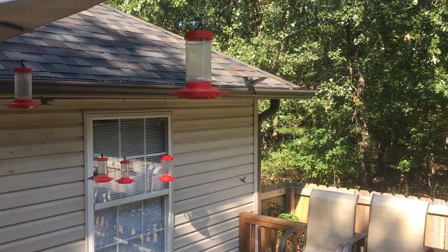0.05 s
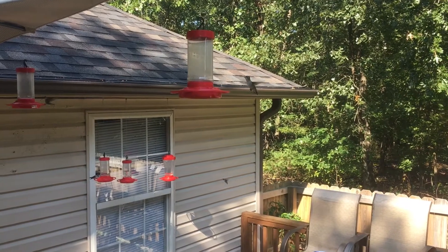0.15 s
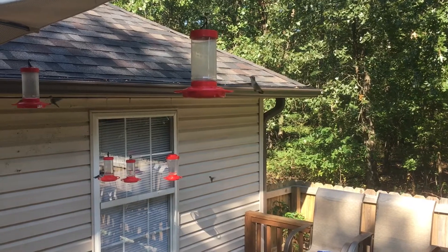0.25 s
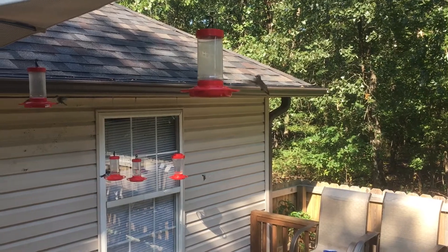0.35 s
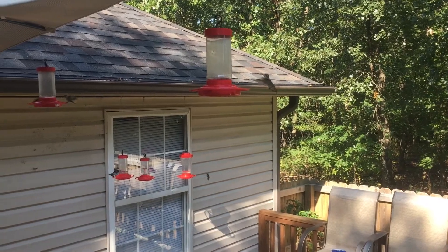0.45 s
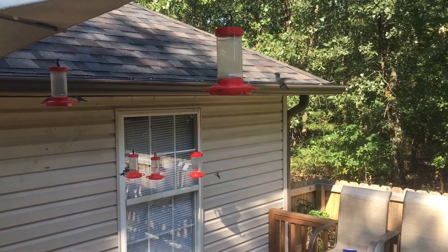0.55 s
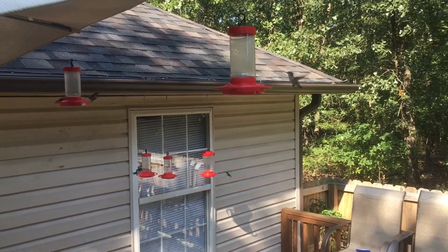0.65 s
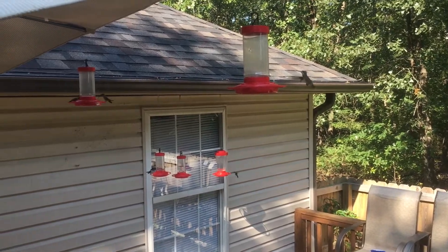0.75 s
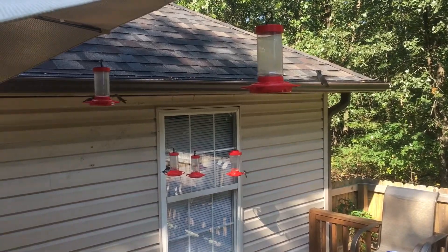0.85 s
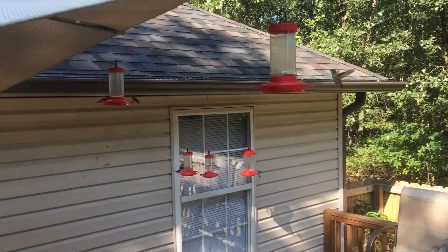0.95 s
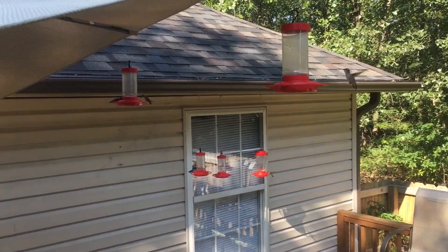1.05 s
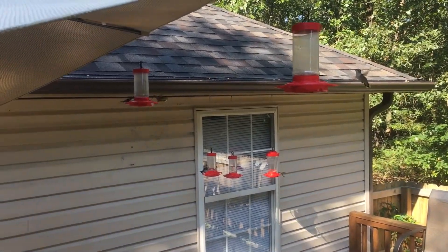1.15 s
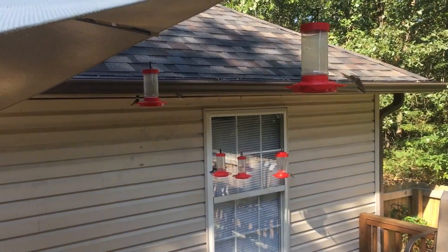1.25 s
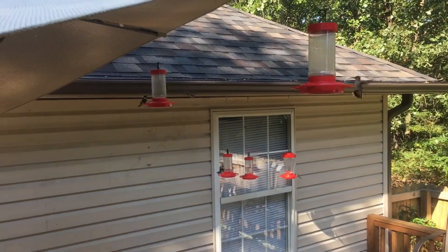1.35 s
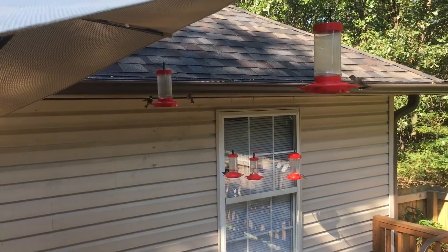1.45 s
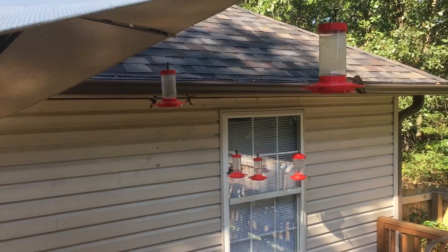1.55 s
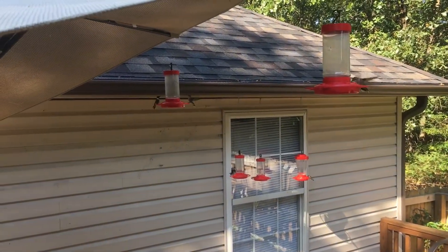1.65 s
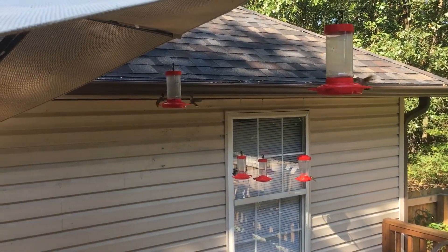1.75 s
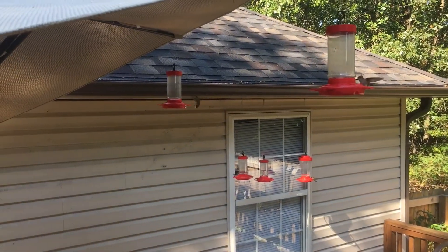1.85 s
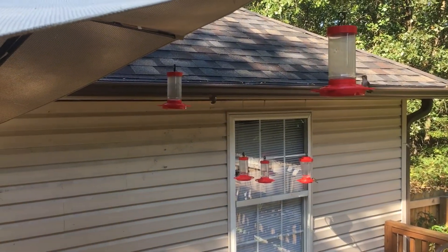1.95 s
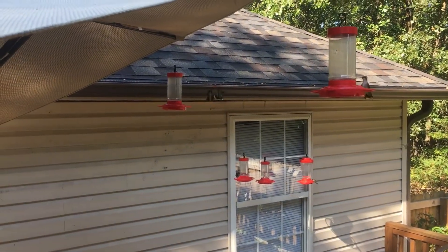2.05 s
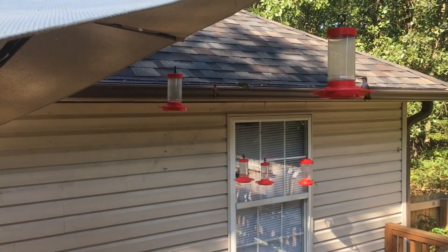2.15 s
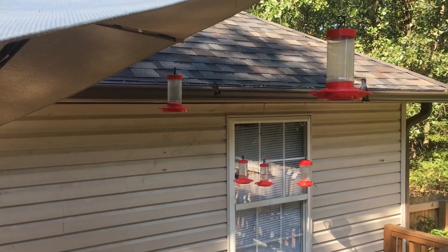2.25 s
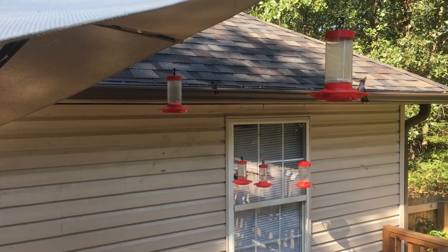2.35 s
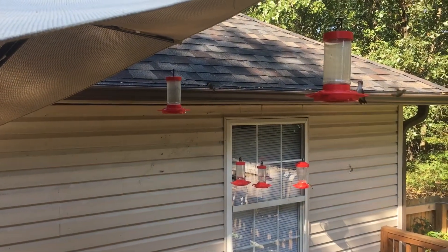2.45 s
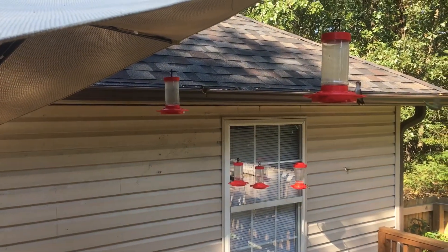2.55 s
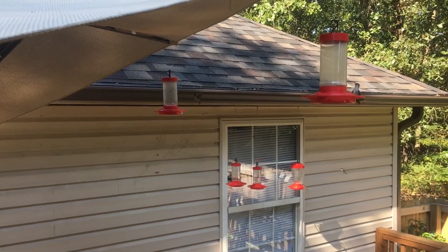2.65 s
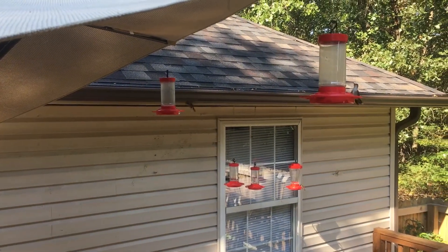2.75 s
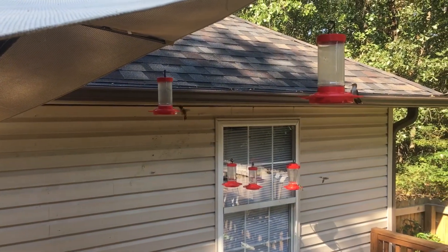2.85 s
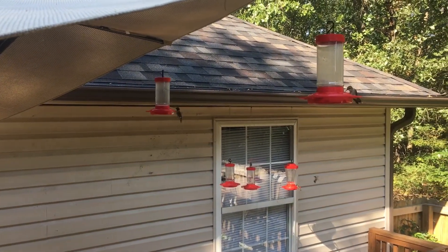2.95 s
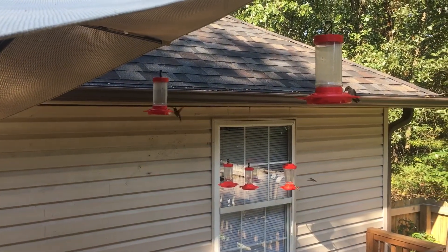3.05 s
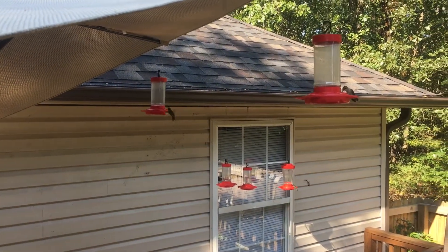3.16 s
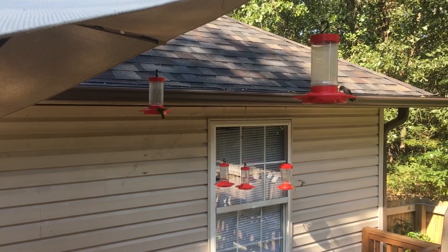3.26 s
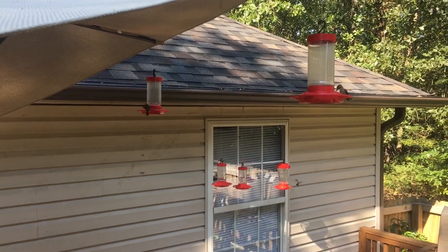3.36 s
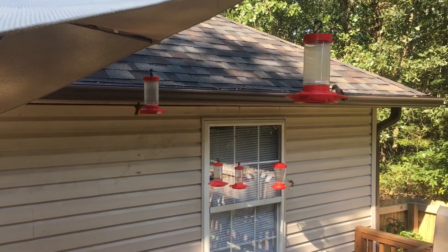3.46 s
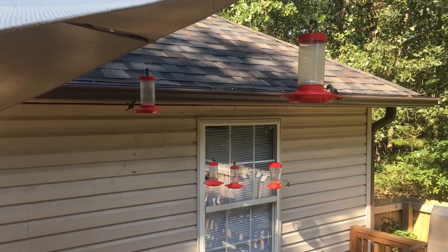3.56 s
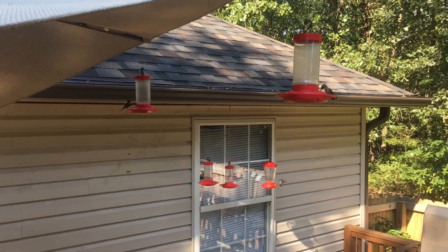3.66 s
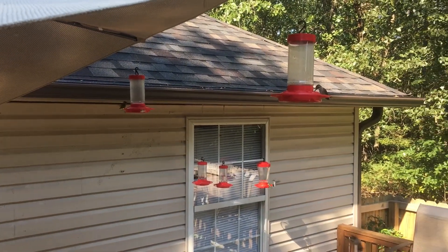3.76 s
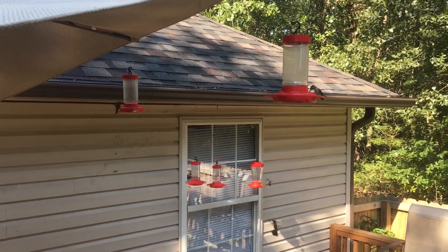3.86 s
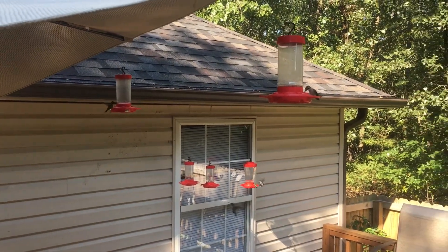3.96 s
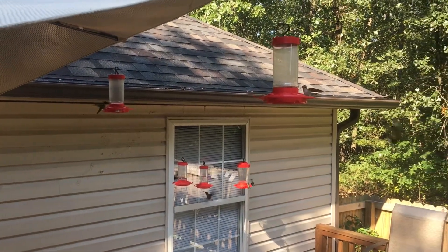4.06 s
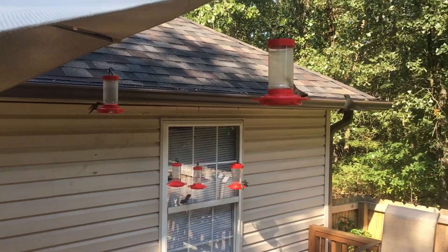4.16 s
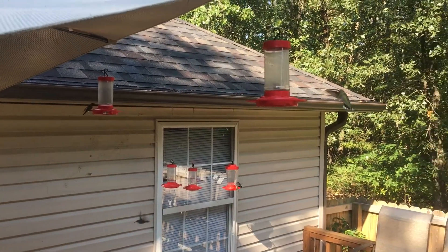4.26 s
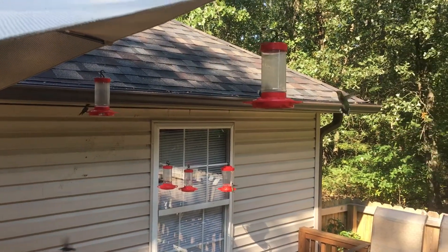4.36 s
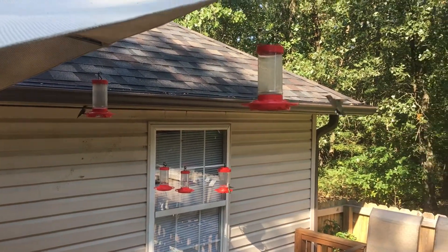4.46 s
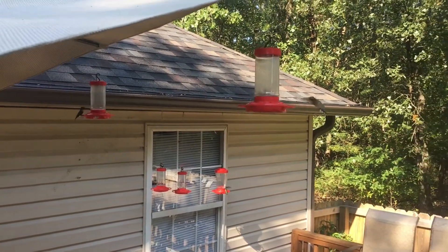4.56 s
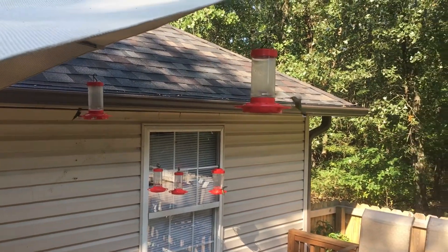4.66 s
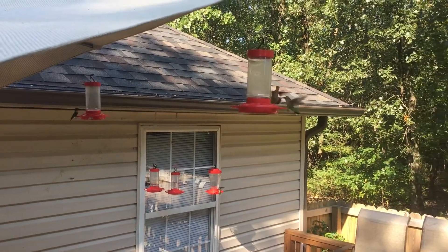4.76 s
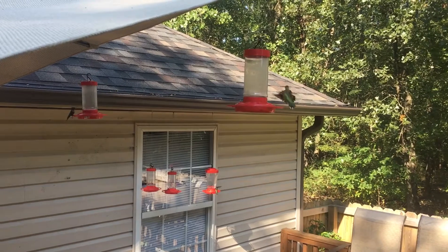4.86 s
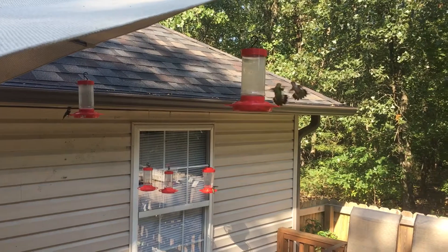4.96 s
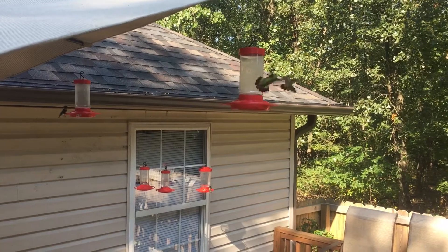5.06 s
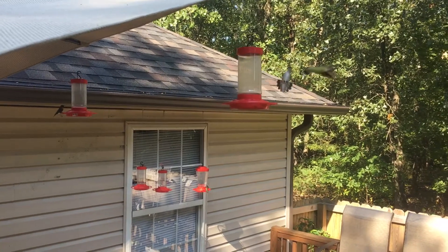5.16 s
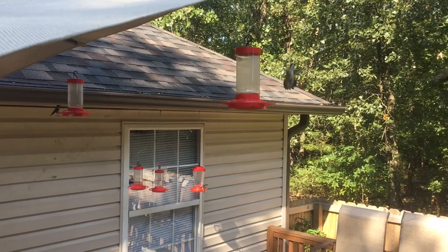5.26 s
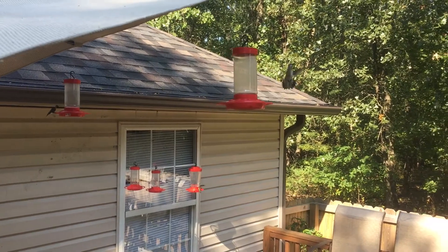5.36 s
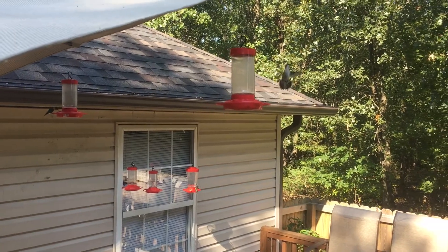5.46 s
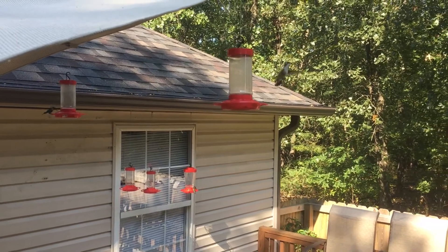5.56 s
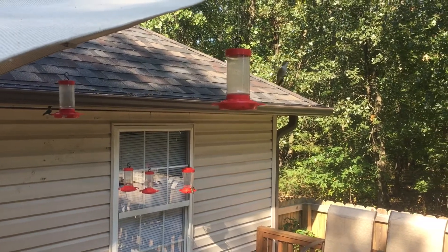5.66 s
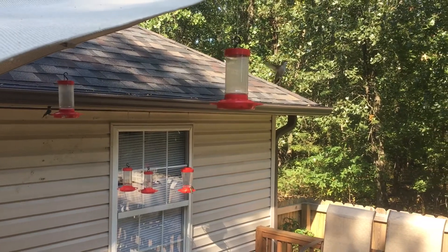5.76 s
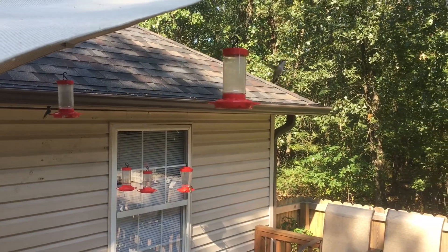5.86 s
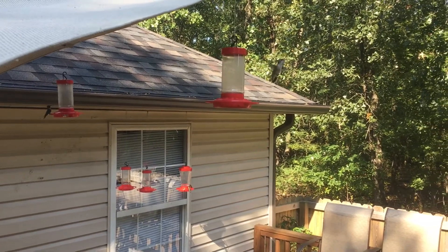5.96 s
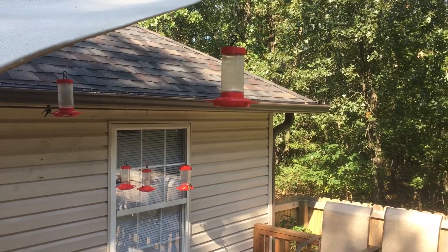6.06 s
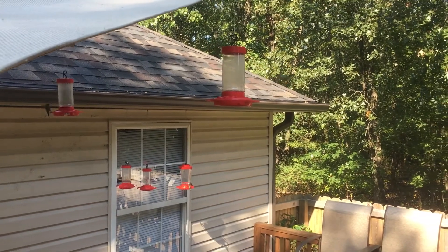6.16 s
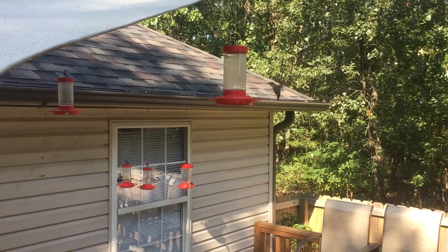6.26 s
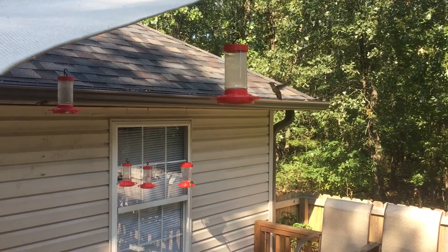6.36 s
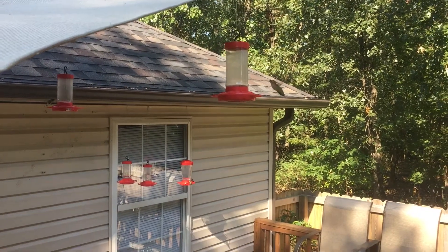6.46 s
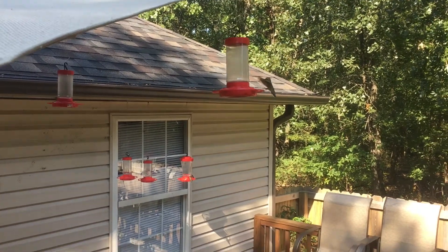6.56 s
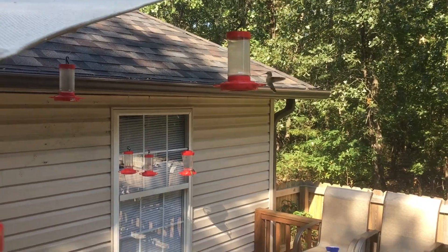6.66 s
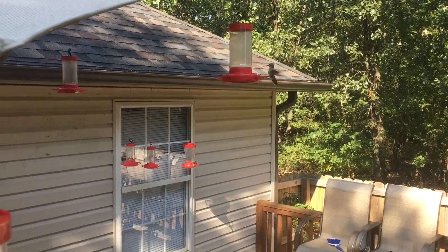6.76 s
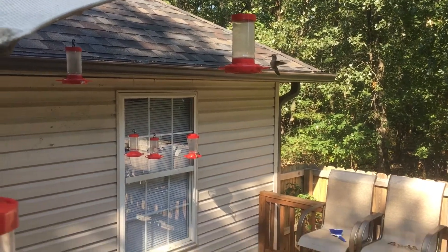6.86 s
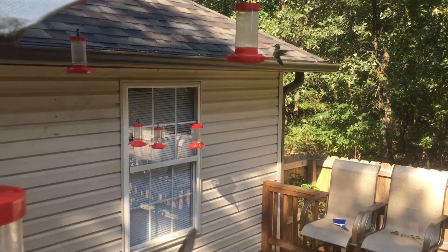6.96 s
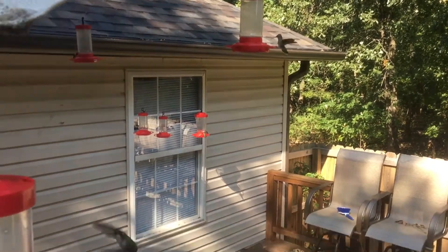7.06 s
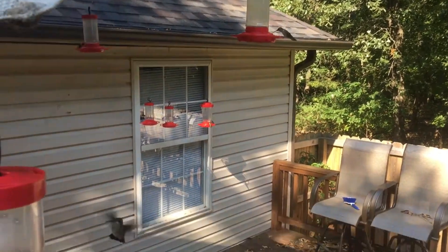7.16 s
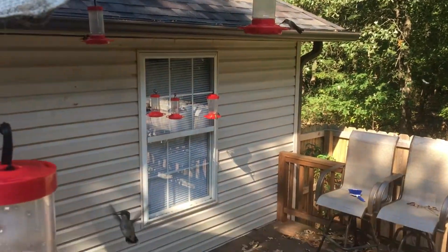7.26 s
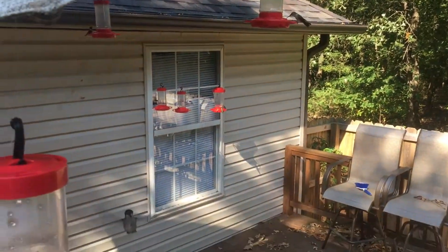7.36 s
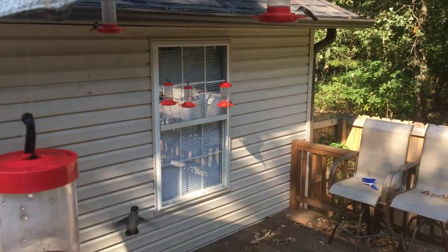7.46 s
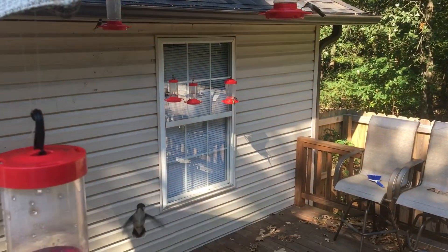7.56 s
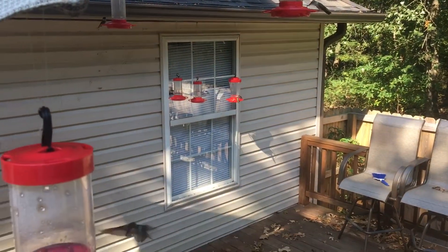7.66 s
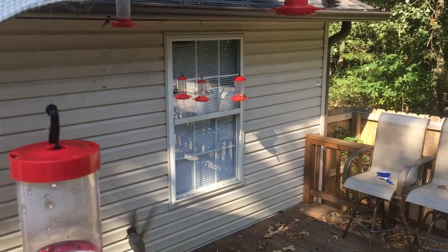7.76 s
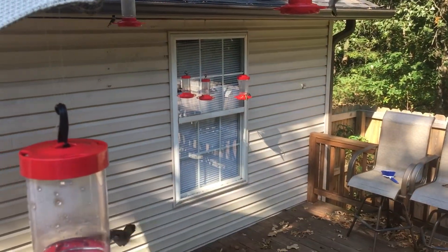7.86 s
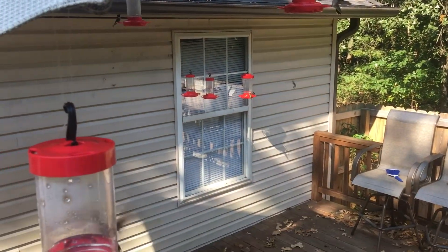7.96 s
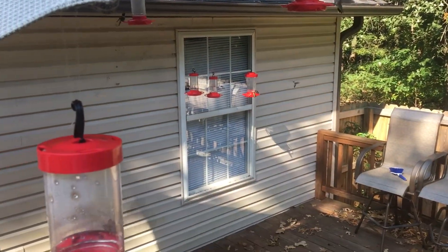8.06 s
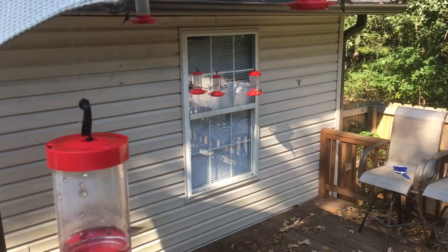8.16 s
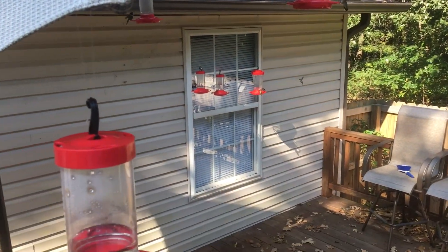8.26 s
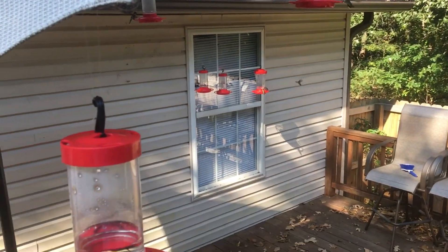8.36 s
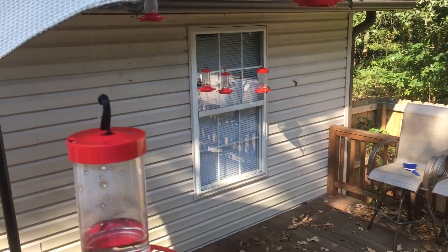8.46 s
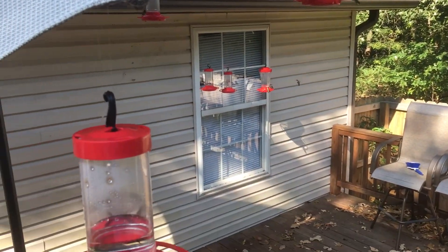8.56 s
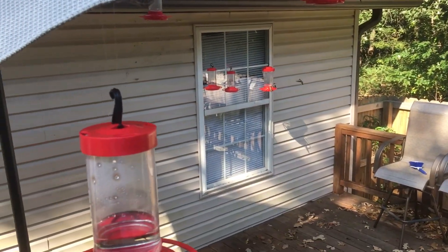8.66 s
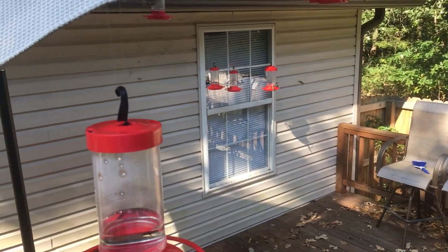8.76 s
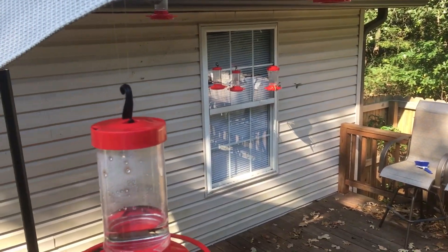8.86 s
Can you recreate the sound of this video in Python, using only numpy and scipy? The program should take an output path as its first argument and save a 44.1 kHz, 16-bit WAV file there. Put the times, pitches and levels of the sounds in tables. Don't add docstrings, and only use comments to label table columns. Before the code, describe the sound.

Hummingbirds squeak, chip and buzz in sharp quick bursts around backyard feeders, wings humming past, over a soft shimmer of insects and a distant plane drone.

```python
import sys
import numpy as np
from scipy import signal
from scipy.fft import rfft, irfft
from scipy.io import wavfile

SR = 44100
rng = np.random.default_rng(int(sys.argv[2]) if len(sys.argv) > 2 else 0)


def invert_db(x):
    u = np.asarray(x, float) / 20
    return 10 ** u


def store_wav(level_fs):
    pcm = np.round(np.clip(np.atleast_2d(level_fs), -1, 1) * 32767)
    wavfile.write(sys.argv[1], SR, pcm.T.astype(np.int16))


N = 392490
T = np.arange(N) / SR

# hz, gain_db
FACING = [(1500, 1), (3000, -4.5), (4500, -7), (6300, -1), (8300, 1), (10500, -7), (13000, -9),
          (16000, -24)]


def rms_one(x):
    return x / np.sqrt(np.mean(x ** 2) + 1e-20)


def in_time(rows, t=T):
    s, *columns = np.transpose(rows)
    return [np.interp(t, s, c) for c in columns]


def at_hz(points, hz):
    return np.interp(np.log(hz), np.log(np.array(points)[:, 0]), np.array(points)[:, 1])


def span(start_s, length_s):
    return np.arange(round(start_s * SR), min(round((start_s + length_s) * SR), N))


def bump(t, half_s):
    return np.exp(-0.5 * (t / half_s) ** 2)


def drift(rate_hz):
    r = np.exp(-80 * np.pi * rate_hz / SR)
    slow = signal.lfilter([1], [1, -2 * r, r * r], rng.standard_normal(N // 40 + 2002))[2000:]
    return np.interp(np.arange(N) / 40, np.arange(len(slow)), rms_one(slow))


def coloured(spectrum):
    hz = np.arange(1, N // 2 + 2) * SR / N
    inside = (hz > spectrum[0][0]) & (hz < spectrum[-1][0])
    gain = invert_db(at_hz(spectrum, hz)) * inside
    return rms_one(irfft(rfft(rng.standard_normal(N)) * gain, N))


def resonate(x, hz, width_hz):
    r = np.exp(-np.pi * width_hz / SR)
    return signal.lfilter([1, 0, -1], [1, -2 * r * np.cos(2 * np.pi * hz / SR), r * r], x)


def yard(x, t60_s, gap_s):
    t = np.arange(SR // 2) / SR
    burst = rng.standard_normal(len(t)) * invert_db(-60 * t / t60_s) * (t > gap_s)
    return signal.fftconvolve(x, burst / np.linalg.norm(burst))[:N]


def voice(pitch_hz, throat, overtones_db=0):
    phase = 2 * np.pi * np.cumsum(pitch_hz) / SR
    ranks = np.arange(1, 11)[:, None]
    audible = ranks * pitch_hz < 0.45 * SR
    gains = invert_db(at_hz(throat, ranks * pitch_hz) + overtones_db * (ranks > 1)) * audible
    return (gains * np.sin(ranks * phase)).sum(axis=0)


def whistles(notes, octave_db, hoarse, peak_at, swell_db, fade_db, edge_s=0.0017):
    out, wobble, flutter = np.zeros(N), drift(230), drift(90)
    wobble_hz, flutter_db = hoarse
    for start_s, length_s, first_hz, last_hz, level_db in notes:
        at = span(start_s, length_s)
        share = (at - at[0]) / SR / length_s
        pitch_hz = first_hz + (last_hz - first_hz) * share + wobble_hz * wobble[at]
        phase = 2 * np.pi * np.cumsum(pitch_hz) / SR
        effort_db = np.interp(share, [0, peak_at, 1], [-swell_db, 0, -fade_db])
        edge = np.clip(np.minimum(share, 1 - share) * length_s / edge_s, 0, 1)
        gain = np.sqrt(2) * edge * invert_db(level_db + effort_db + flutter_db * flutter[at])
        out[at] += gain * (np.sin(phase) + invert_db(octave_db) * np.sin(2 * phase))
    return out


def chips(table, throat, bend, rise, fall, depth=0, rough=0):
    warble_hz = 207
    out, shiver, waver = np.zeros(N), invert_db(drift(60.0)), drift(274)
    for start_s, length_s, first_hz, last_hz, level_db, *turn_db in table:
        at = span(start_s, length_s)
        t = (at - at[0]) / SR
        share = t / length_s
        slide_hz = first_hz + (last_hz - first_hz) * share ** bend
        close = np.clip((share - 0.86) / 0.089, 0, 1)
        warble = depth * ((1 - close) * np.cos(2 * np.pi * warble_hz * (t - 0.001)) - close)
        pitch_hz = slide_hz + first_hz * (warble + rough * waver[at])
        swell = np.clip(np.minimum(share / rise, (1 - share) / fall), 0, 1)
        gain = invert_db(level_db) * np.sin(np.pi / 2 * swell) ** 2
        out[at] += gain * voice(pitch_hz, throat, sum(turn_db))
    return out * shiver


def alike(table, length_s, ends_at):
    return [(s, length_s, hz, hz * ends_at, db) for s, hz, db in table]


def air_rumble():
    # hz, level_db_per_hz
    spectrum = [(25, -36), (38, -5), (55, 1), (100, -4.5), (200, -8), (400, -19.5), (800, -30), (1400, -36),
                (3000, -43)]
    gust_db = 2.5 * bump(T - 6.3, 0.16)
    return invert_db(-56 + gust_db) * coloured(spectrum)


def plane():
    # time_s, blade_hz, level_db, octave_db
    course = [(0, 169.9, -49.5, -66.5), (2.2, 167.8, -50, -68), (4.6, 163.4, -50.5, -70.5),
              (5.3, 162.8, -55.5, -78), (5.8, 163.2, -58, -94), (6.7, 159.1, -56.5, -73),
              (7.6, 158.9, -61.5, -80), (8.9, 160, -64.5, -80)]
    pitch_hz, level_db, octave_db = in_time(course)
    phase = 2 * np.pi * np.cumsum(pitch_hz) / SR + 0.16 * drift(2.6)
    waver = invert_db(drift(10.0))
    return np.sqrt(2) * waver * (invert_db(level_db) * np.sin(phase) + invert_db(octave_db) * np.sin(2 * phase))


def cicadas():
    # time_s, low_db, high_db
    levels = [(0.0, -63.5, -62.5), (7.93, -68.5, -62.5), (8.9, -66.5, -59.5)]
    # hz, level_db_per_hz
    low_spectrum = [(530, -60), (900, -6), (947, -9.5), (1680, -7.5), (1970, -1), (2220, 4), (2630, 2.5),
                    (2870, 4), (3320, 4.5), (3710, -1.5), (5200, -17), (6760, -43), (11400, -120)]
    # hz, level_db_per_hz
    high_spectrum = [(2710, -26), (4600, -7), (5100, -8), (5730, -4), (6060, 1.5), (6620, -3.5), (7330, -1),
                     (7950, -1), (8460, -1), (9000, -1.5), (9710, -8), (10500, -16), (13000, -12.5),
                     (15600, -17)]
    low_db, high_db = in_time(levels)
    singers = np.zeros(N)
    for hz in (2275, 2500, 2854, 3250):
        singers += invert_db(1.8 * drift(6.4)) * rms_one(resonate(rng.standard_normal(N), hz, 97))
    low = invert_db(1.07 * drift(14.4)) * coloured(low_spectrum) + invert_db(-11.5) * singers
    pulses = np.exp(0.64 * np.cos(2 * np.pi * 162 * T + 2.4 * drift(6.3)))
    buzz = rms_one(resonate(resonate(rng.standard_normal(N), 6120, 400), 6120, 400) * pulses)
    high = invert_db(1.35 * drift(7.3)) * coloured(high_spectrum) + invert_db(-19.0 + 0.66 * drift(5.9)) * buzz
    return invert_db(low_db) * low + invert_db(high_db) * high


def crickets():
    # start_s, end_s, wing_tone_hz, pulses_per_s, level_db
    bouts = [(0, 1.24, 8545, 29.6, -66), (1.27, 2.9, 8190, 30.3, -73), (2.33, 4.4, 8465, 29.2, -69.5),
             (4.4, 7.01, 8545, 28.9, -68.5), (7.0, 8.9, 8190, 31, -72), (0, 3.95, 7755, 26, -70),
             (5.52, 5.8, 7080, 28, -68), (2.1, 2.95, 7050, 24, -76), (4.5, 8.9, 7745, 26.8, -70)]
    rasp_db, rasp_below_hz, rasp_width_hz = -5, 160, 240
    out, waver, fading = np.zeros(N), drift(30), drift(9)
    for k, (start_s, end_s, hz, per_s, level_db) in enumerate(bouts):
        at = span(start_s, end_s - start_s)
        own = (at - k * SR) % N
        tone_hz = hz + 24 * waver[own]
        stroke = np.exp(0.55 * np.cos(2 * np.pi * per_s * T[at] + 0.8 * fading[at]))
        tone = rms_one(stroke * np.sin(2 * np.pi * np.cumsum(tone_hz) / SR))
        rasp = rms_one(resonate(rng.standard_normal(len(at)), hz - rasp_below_hz, rasp_width_hz))
        out[at] += invert_db(level_db + 1.5 * fading[own]) * (tone + invert_db(rasp_db) * rasp)
    return out


def katydids():
    wing_hz = [9350, 8850]
    steady_s = [.04, .26, .45, .71, .95, 1.21, 1.46, 1.75, 2.0, 2.27, 2.53, 2.77, 2.98, 3.2, 3.5, 3.74,
                4.03, 4.24, 4.48, 4.74, 5.0, 5.25, 5.5, 5.72, 6.0, 6.25, 6.5, 6.82, 7.08, 7.33, 7.6, 7.82,
                8.05, 8.33, 8.62, 8.82]
    # time_s, level_db
    steady_level = [(0, -68.5), (5.5, -75), (6.6, -65), (8.9, -70)]
    fitful_s = [.06, .29, .55, .82, 1.15, 1.42, 1.66, 1.86, 2.13, 2.39, 2.63, 3.05, 3.29, 3.53, 3.77, 4.27,
                4.57, 5.67, 5.9, 6.1, 6.32, 6.52, 6.85, 7.07, 7.3, 7.56, 8.01, 8.6]
    fitful_db, spread_db = -71, 0.8
    out, teeth = np.zeros(N), 1.8 + 0.14 * np.cos(2 * np.pi * 130 * T)
    steady = list(zip(steady_s, in_time(steady_level, steady_s)[0]))
    fitful = [(s, fitful_db) for s in fitful_s]
    for chirps, hz in zip([steady, fitful], wing_hz):
        rasp = rms_one(resonate(resonate(rng.standard_normal(N) * teeth, hz, 300), hz, 300))
        for (middle_s, level_db), luck in zip(chirps, rng.standard_normal(len(chirps))):
            at = span(max(middle_s - 0.05, 0), 0.1)
            out[at] += invert_db(level_db + 2.5 + spread_db * luck) * rasp[at] * np.hanning(len(at))
    return out


def far_hoot():
    # start_s, length_s, first_hz, last_hz, level_db
    hoots = [
        (6.56, 0.15, 1018, 980, -69.5),
        (6.69, 0.201, 990, 900, -68),
    ]
    return whistles(hoots, octave_db=-32, hoarse=(9, 1.3), peak_at=0.18, swell_db=4, fade_db=12, edge_s=0.015)


def wings():
    # middle_s, half_length_s, hum_db, beats_per_s
    passes = [(0.545, 0.11, -65.5, 52), (1.204, 0.43, -66, 46.5), (2.099, 0.21, -62, 60),
              (2.493, 0.099, -63, 53), (2.97, 0.13, -57, 50), (3.397, 0.21, -65.5, 51),
              (3.8, 0.093, -59, 53), (4.162, .06, -53.5, 43), (4.697, 0.054, -61, 53),
              (4.877, 0.049, -60, 55), (5.199, 0.086, -60, 49.4), (5.595, .12, -63, 46),
              (5.022, 0.046, -63, 46), (6.36, .08, -58, 45), (6.653, .2, -60, 42), (7.011, 0.051, -57, 50),
              (7.117, 0.099, -57.5, 41), (7.502, 0.14, -64, 41), (7.801, 0.15, -59, 41),
              (8.116, .12, -60.5, 44.7), (8.601, 0.25, -68, 51)]
    # multiple_of_beat, gain_db
    orders = [(1, -6.5), (2, 3), (3, -8), (4, -1), (5, -11), (6, -9.5), (8, -10.5), (10, -26.5),
              (12, -19.5)]
    # hz, level_db_per_hz
    hiss_spectrum = [(60, -10), (150, 0.5), (400, -6.5), (800, -24.5), (2000, -26.5), (5000, -31),
                     (12000, -36)]
    out, hiss, effort = np.zeros(N), coloured(hiss_spectrum), drift(6.0)
    ranks, order_db = np.transpose(orders)[:, :, None]
    biases = rng.standard_normal((len(passes), len(orders), 1))
    for (middle_s, half_s, hum_db, beat_hz), bias in zip(passes, biases):
        at = span(max(middle_s - 3 * half_s, 0), 6 * half_s)
        phase = 2 * np.pi * np.cumsum(beat_hz * (1 + 0.0193 * effort[at])) / SR
        hum = (invert_db(order_db + 0.92 * bias) * np.cos(ranks * (phase - 0.6))).sum(axis=0)
        puffs = hiss[at] * np.exp(0.96 * np.cos(phase))
        out[at] += invert_db(hum_db) * bump(T[at] - middle_s, half_s) * (hum + invert_db(-5.0) * puffs)
    return out


def close_strokes():
    # time_s, snap_db
    beats = [(6.115, -43), (6.137, -34), (6.159, -36), (6.179, -29.5), (6.199, -30), (6.219, -34),
             (6.237, -36), (6.248, -40), (6.259, -36), (6.278, -40), (4.137, -38), (4.157, -49),
             (4.178, -51), (4.2, -50)]
    suck_s, push_s, push_db = 0.00062, 0.0017, -5
    return_s, return_db = 0.0095, -6
    rustle_s, rustle_db = 0.0058, -23
    out, rustle = np.zeros(N), coloured([(300, 6.5), (1200, -15.5), (7000, -20.5)])
    for middle_s, snap_db in beats:
        at = span(middle_s - 0.01, 0.035)
        for late_s, loss_db in ((0, 0), (return_s, return_db)):
            t = T[at] - middle_s - late_s
            push = invert_db(push_db) * bump(t - 2 * suck_s - push_s / 2, push_s)
            feathers = invert_db(rustle_db) * rustle[at] * bump(t, rustle_s)
            out[at] += invert_db(snap_db + loss_db) * (push + feathers - bump(t, suck_s))
    return out


def dry_snaps():
    # time_s, peak_db
    snaps = [(2.037, -48), (2.048, -51), (2.054, -57), (2.351, -52), (2.358, -52), (2.855, -52),
             (.634, -52), (3.058, -52), (3.075, -54), (1.455, -53), (1.62, -50), (4.748, -50)]
    decay_s, low_hz, high_hz = 0.0017, 1200, 9000
    out, fade = np.zeros(N), np.exp(-np.arange(400) / SR / decay_s)
    for (s, peak_db), crack in zip(snaps, rng.standard_normal((len(snaps), 400))):
        out[round(s * SR):][:400] += invert_db(peak_db) * crack * fade
    band = signal.butter(1, [low_hz, high_hz], "band", fs=SR, output="sos")
    return signal.sosfilt(band, out + 1e-18)


def hoarse_whistles():
    # start_s, length_s, first_hz, last_hz, level_db
    shut = [(.172, 0.12, 6200, 5960, -62), (.362, 0.064, 7300, 6640, -60), (1.145, 0.08, 6800, 6700, -60),
            (3.055, 0.087, 6120, 5980, -60.5),  (7.45, .08, 6980, 6700, -58),
            (8.14, 0.073, 7100, 6750, -55), (8.67, 0.14, 6350, 6050, -66)]
    # start_s, length_s, first_hz, last_hz, level_db
    wide = [
        (.822, 0.097, 6070, 6350, -56),
        (8.583, 0.078, 6260, 6220, -57.5),
    ]
    out = whistles(shut, octave_db=-15, hoarse=(220, 4.5), peak_at=0.2, swell_db=-4.0, fade_db=8, edge_s=0.004)
    return out + whistles(wide, octave_db=-5.0, hoarse=(120, 1.6), peak_at=0.28, swell_db=8, fade_db=17)


def far_calls():
    # start_s, length_s, first_hz, last_hz, level_db
    buzzes = [(.37, 0.031, 4160, 2640, -62), (1.11, 0.087, 3950, 2970, -64), (3.05, 0.046, 4030, 2550, -67),
              (3.17, 0.048, 4190, 2600, -61), (3.67, 0.08, 5250, 4780, -65.5),
              (6.278, .06, 3580, 3270, -63), (6.77, 0.034, 2960, 1960, -67.5),
              (6.87, 0.04, 3400, 2990, -64), (7.46, 0.058, 3780, 3030, -63),
              (7.585, 0.041, 4670, 2500, -57), (8.097, 0.076, 2720, 2330, -65),
              (8.255, 0.03, 3670, 2680, -65.5), (8.7, 0.063, 5330, 5020, -62.5),
              (8.815, 0.031, 4460, 3970, -61), (8.88, 0.037, 4480, 3040, -61),
              (7.61, 0.038, 3630, 2630, -63)]
    # start_s, first_hz, level_db
    ticks = [(1.29, 3340, -60.5), (5.59, 3490, -58), (7.692, 4300, -52.5), (7.755, 4040, -54),
             (7.82, 3770, -56.5), (7.888, 3467, -56.5), (7.952, 3900, -55.5)]
    # start_s, first_hz, level_db
    late_ticks = [(8.328, 3524, -59.5), (8.388, 3500, -63), (8.445, 3300, -65), (8.508, 3350, -62)]
    # start_s, length_s, first_hz, last_hz, level_db
    trills = [(8.635, .028, 4120, 4350, -57), (8.715, .055, 4000, 4350, -65),
              (8.812, 0.034, 4000, 3600, -59), (8.815, 0.0225, 2700, 4900, -56),
              (8.258, .022, 2500, 5500, -55), (8.572, 0.0173, 2710, 2000, -58),
              (8.645, .014, 2500, 2600, -58), (4.6, .04, 4750, 4700, -55), (8.69, 0.031, 2500, 2300, -64)]
    # hz, gain_db
    distant = [(1500, 0), (3000, -2.5), (4500, -2.5), (6500, 5.5), (8500, 3.5), (11000, -6), (16000, -17)]
    # hz, gain_db
    hidden = [(1500, -2), (3400, -8), (5000, -9.5), (6500, -4), (9000, -6), (16000, -25)]
    # hz, gain_db
    low_leaves = [(1500, 2), (2500, -4), (3400, -1), (5000, -12), (9000, -8), (16000, -24)]
    out = chips(buzzes, distant, bend=1.2, rise=0.15, fall=0.24, depth=0.177, rough=0.0144)
    out += chips(alike(ticks, 0.024, 0.52), hidden, bend=1.2, rise=0.085, fall=0.25, rough=0.0336)
    out += chips(alike(late_ticks, 0.022, 0.44), low_leaves, bend=1.3, rise=0.15, fall=0.12, rough=0.028)
    return out + chips(trills, hidden, bend=1.15, rise=0.15, fall=0.27, depth=0.03, rough=0.028)


def turned_chips():
    # start_s, length_s, first_hz, last_hz, level_db, overtones_db
    low = [
        (.6155, 0.0078, 2020, 1580, -61.5, 5),
        (2.850, .010, 1940, 1740, -56, -1),
        (2.861, .008, 1510, 1310, -62, -6),
    ]
    # start_s, length_s, first_hz, last_hz, level_db, overtones_db
    held = [(2.345, 0.0167, 1930, 1480, -53, 0)]
    # start_s, length_s, first_hz, last_hz, level_db, overtones_db
    long_chip = [(5.912, 0.02, 2460, 1410, -53.5, -4)]
    # start_s, length_s, first_hz, last_hz, level_db
    cornered = [(.571, 0.0057, 1290, 990, -65), (.599, 0.014, 2050, 1700, -60),
                (.627, 0.012, 2290, 1480, -56), (2.046, 0.0083, 1890, 1460, -63),
                (2.371, 0.011, 2060, 1800, -67), (4.747, 0.0058, 2300, 1650, -52),
                (7.82, .0156, 1880, 1540, -61.5), (8.395, .011, 2010, 1410, -61.5),
                (8.455, .009, 1950, 1600, -67), (8.774, 0.012, 1890, 1460, -60.5),
                (8.863, 0.0105, 1800, 1450, -60.5)]
    # hz, gain_db
    turned = [(1500, 2), (2500, 2.5), (3800, 0), (5700, 3.5), (7500, 1), (11000, -21), (16000, -22)]
    # hz, gain_db
    nasal = [(1900, 1), (3800, -10), (5700, 4.5), (7600, -9), (9500, -15), (13400, -24), (16000, -25)]
    # hz, gain_db
    muffled = [(1500, 5), (2500, -6), (3500, -6.5), (5700, -7), (8000, -3), (16000, -26)]
    out = chips(low, turned, bend=1.5, rise=0.12, fall=0.19, rough=0.028)
    out += chips(held, nasal, bend=3.6, rise=0.08, fall=0.26, rough=0.03)
    out += chips(long_chip, turned, bend=1.0, rise=0.16, fall=0.31, rough=0.006)
    return out + chips(cornered, muffled, bend=1.0, rise=0.22, fall=0.21, rough=0.028)


def clear_whistles():
    # start_s, length_s, first_hz, last_hz, level_db
    wide = [(.991, 0.095, 7000, 6720, -50), (2.932, 0.1, 6150, 6230, -55), (2.98, 0.062, 6250, 6340, -60),
            (3.03, 0.055, 6330, 6200, -56), (7.388, 0.057, 6600, 6940, -54.5),
            (8.427, 0.073, 5640, 5770, -46), (8.472, 0.056, 5890, 5810, -48), (8.515, .03, 5850, 5900, -65)]
    # start_s, length_s, first_hz, last_hz, level_db
    shut = [(.064, 0.072, 6790, 6790, -47), (.451, 0.015, 6050, 6040, -58), (.512, .011, 6100, 6000, -59),
            (.596, 0.014, 7070, 7180, -53), (2.989, 0.062, 7030, 6850, -56),
            (4.505, 0.053, 7260, 7250, -57), (4.607, 0.015, 7200, 7100, -50),
            (7.36, 0.091, 7720, 7600, -54.5), (8.099, 0.018, 7150, 7250, -52),
            (8.11, 0.049, 7250, 7400, -51), (8.625, 0.052, 6540, 6380, -52),
            (8.812, 0.076, 7060, 6880, -51.5)]
    out = whistles(wide, octave_db=-8.5, hoarse=(45, 2.2), peak_at=0.34, swell_db=5, fade_db=12.5)
    return out + whistles(shut, octave_db=-22, hoarse=(45, 2.1), peak_at=0.42, swell_db=7.0, fade_db=15.0)


def nearest_whistle():
    # time_s, pitch_hz, level_db, octave_db
    effort = [(4.617, 6690, -40, -8), (4.642, 6600, -35.5, -4), (4.649, 6560, -43, 0),
              (4.655, 6580, -47, 1), (4.661, 6640, -35, -8), (4.666, 6540, -33.5, -10),
              (4.673, 6610, -49, -7), (4.681, 6580, -41, -20), (4.705, 6550, -61, -14)]
    at = span(effort[0][0], effort[-1][0] - effort[0][0])
    pitch_hz, level_db, octave_db = in_time(effort, T[at])
    phase, out = 2 * np.pi * np.cumsum(pitch_hz) / SR, np.zeros(N)
    edge = np.minimum((at - at[0]) / SR / 0.0015, 1)
    out[at] = np.sqrt(2) * edge * invert_db(level_db) * (np.sin(phase) + invert_db(octave_db) * np.cos(2 * phase))
    return out


def squeaks():
    # start_s, length_s, first_hz, last_hz, level_db
    leaps = [
        (4.719, 0.0067, 4900, 6630, -37),
        (4.732, 0.0065, 4050, 6900, -36.5),
    ]
    # time_s, pitch_hz, level_db, overtones_db
    tumbles = [
        [(5.158, 5900, -56, 0), (5.160, 5700, -45, 0), (5.163, 4300, -48, 0), (5.165, 5600, -56, 0)],
        [(4.738, 6800, -48, -6), (4.741, 5600, -52, -6)],
        [(4.674, 6500, -47, -8), (4.6765, 6500, -36, -12), (4.678, 5840, -46, 4), (4.685, 1980, -56, -14)],
        [(5.2485, 6300, -48, 0), (5.250, 6100, -30, -1), (5.254, 6550, -33, -6), (5.257, 5930, -45, 0),
         (5.260, 5050, -37, -1), (5.263, 5600, -27, 4), (5.2655, 6050, -34, 7), (5.2675, 5600, -45, 2)],
        [(5.2675, 5540, -44, 2), (5.271, 5510, -34, 2), (5.2738, 2920, -34, 2), (5.2765, 4500, -33, -1),
         (5.280, 2470, -43, -4), (5.2825, 1700, -46, -10)],
        [(8.424, 6500, -58, -20), (8.429, 5700, -49, -12)],
        [(2.505, 7350, -66, -20), (2.52, 7450, -60, -20), (2.535, 7750, -56, -20)],
    ]
    out = np.zeros(N)
    for start_s, length_s, first_hz, last_hz, level_db in leaps:
        at = span(start_s, length_s)
        share = (at - at[0]) / SR / length_s
        effort_db = np.interp(share, [0, 0.32, 1], [-16, 0, -15])
        pitch_hz = last_hz + (first_hz - last_hz) * np.exp(-3.45 * share)
        out[at] += invert_db(level_db + effort_db) * voice(pitch_hz, FACING)
    for rows in tumbles:
        at = span(rows[0][0], rows[-1][0] - rows[0][0])
        pitch_hz, level_db, overtones_db = in_time(rows, T[at])
        release = np.minimum((at[-1] - at) / SR / 0.0008, 1)
        out[at] += invert_db(level_db) * release * voice(pitch_hz, FACING, overtones_db)
    return out


def near_chips():
    # start_s, length_s, first_hz, level_db, overtones_db
    falling = [(4.89, 0.025, 3400, -42, 2.5), (4.946, 0.022, 3480, -39, -3),
               (5.009, 0.024, 3250, -42.5, -1.5), (5.074, 0.023, 3290, -40, -0.5),
               (5.343, 0.023, 3530, -40, 1), (5.408, 0.023, 3530, -38, 2),
               (5.486, 0.016, 3250, -45.5, -2.5)]
    # start_s, length_s, first_hz, last_hz, level_db
    buzzes = [
        (4.8155, 0.035, 4030, 2350, -44.5),
        (5.159, 0.043, 4870, 2317, -36),
    ]
    # hz, gain_db
    gape = [(2000, -3.5), (4000, -5.5), (6300, 1), (8300, 4), (10500, -3.5), (13000, -7), (16000, -26)]
    ends_at = 0.41
    rows = [(s, length_s, hz, hz * ends_at, db, turn_db) for s, length_s, hz, db, turn_db in falling]
    out = chips(rows, FACING, bend=1.3, rise=0.25, fall=0.45, rough=0.019)
    return out + chips(buzzes, gape, bend=1.2, rise=0.21, fall=0.37, depth=0.2, rough=0.052)


def hummingbirds():
    near = near_chips() + squeaks() + nearest_whistle()
    turned = turned_chips() + dry_snaps()
    clear = clear_whistles()
    far, hoarse = far_calls(), hoarse_whistles()
    to_wall = invert_db(-12.5) * near + invert_db(-10.0) * turned + invert_db(-9.0) * clear
    close = near + turned + clear + yard(to_wall, t60_s=0.13, gap_s=0.0017)
    across = invert_db(1.5) * far + invert_db(-6.0) * hoarse
    return close + across + invert_db(-1.5) * yard(far + hoarse, t60_s=0.19, gap_s=0.0016)


def scene():
    background = air_rumble() + plane() + cicadas() + crickets() + katydids() + far_hoot()
    return (background + wings() + close_strokes() + hummingbirds())[None]


def band_limit(x):
    return signal.sosfilt(signal.butter(12, 15780, fs=SR, output="sos"), x)


def record(dry):
    bass_cut = signal.butter(2, 30, "high", fs=SR, output="sos")
    top_cut = signal.cheby2(20, 50, 16000, fs=SR, output="sos")
    mix = signal.sosfilt(top_cut, signal.sosfilt(bass_cut, dry))
    return band_limit(mix)


dry = scene()
out = record(dry)
store_wav(out)
```